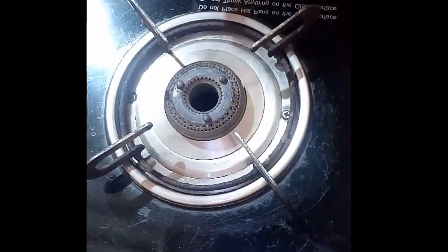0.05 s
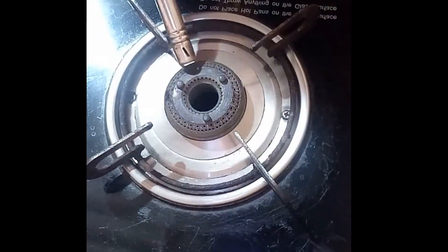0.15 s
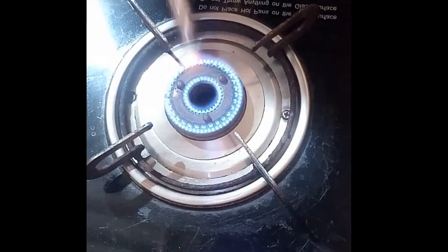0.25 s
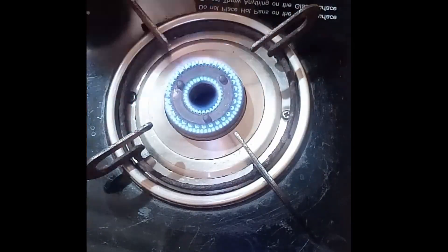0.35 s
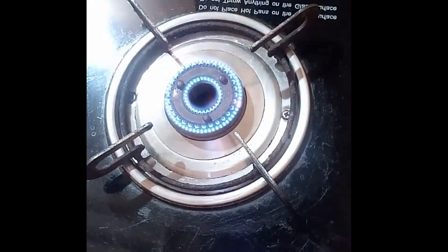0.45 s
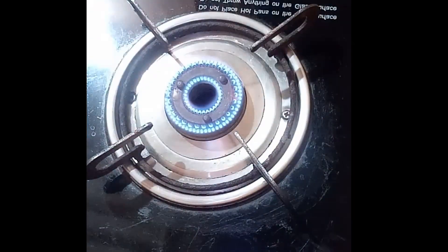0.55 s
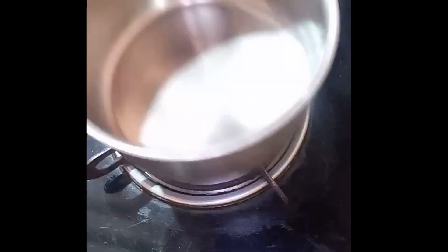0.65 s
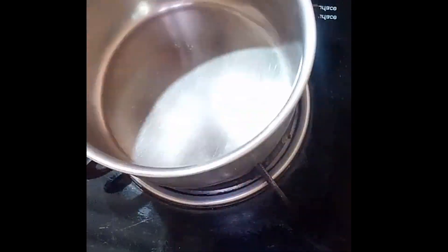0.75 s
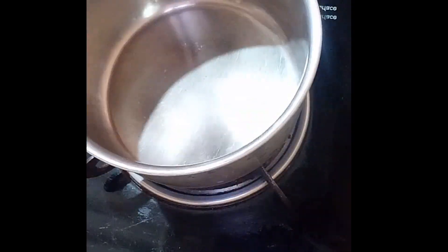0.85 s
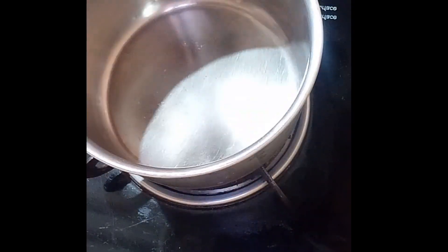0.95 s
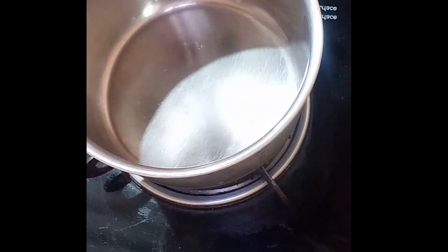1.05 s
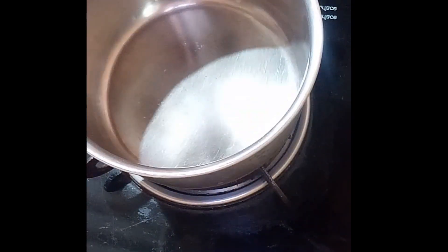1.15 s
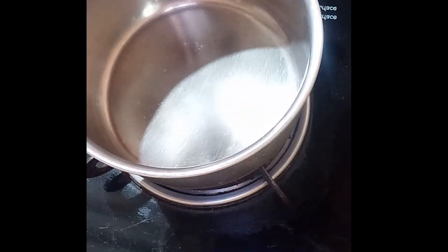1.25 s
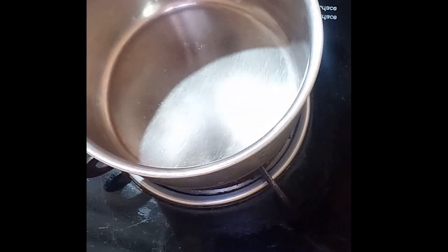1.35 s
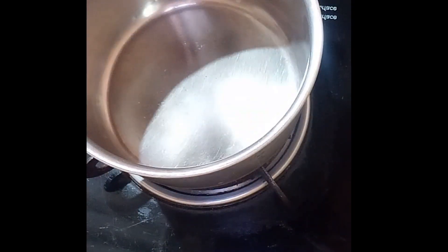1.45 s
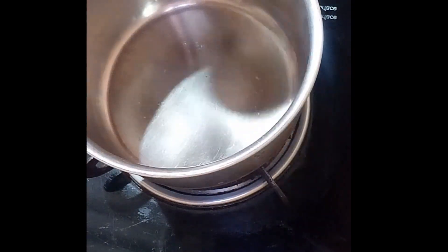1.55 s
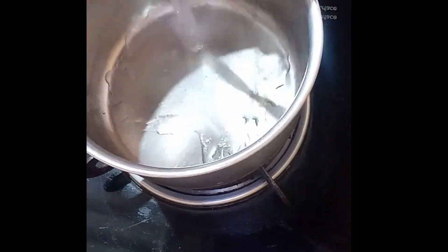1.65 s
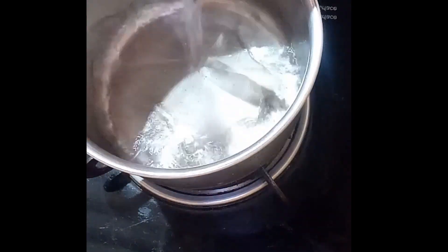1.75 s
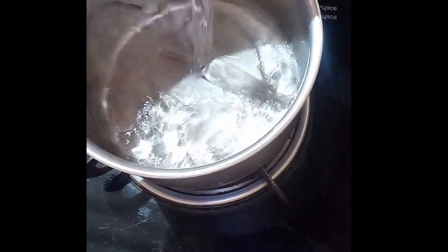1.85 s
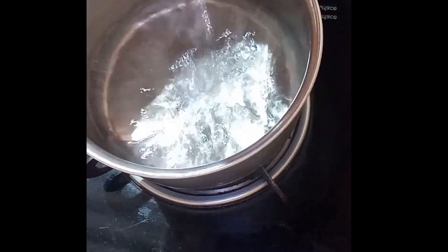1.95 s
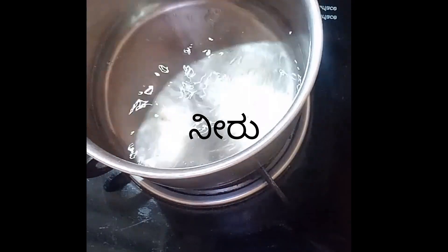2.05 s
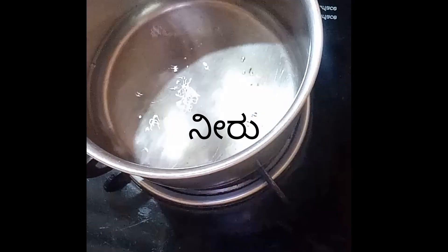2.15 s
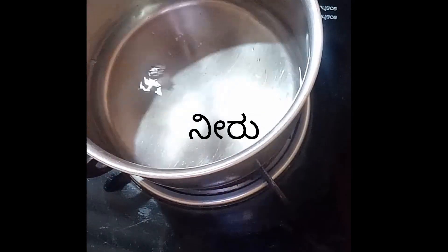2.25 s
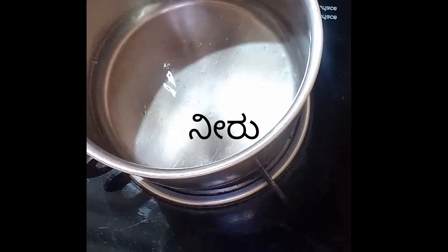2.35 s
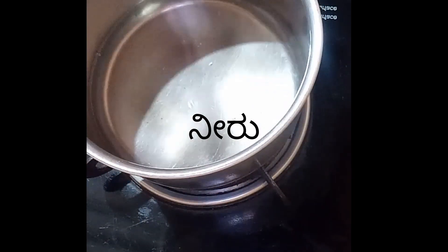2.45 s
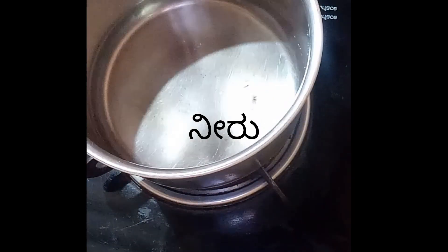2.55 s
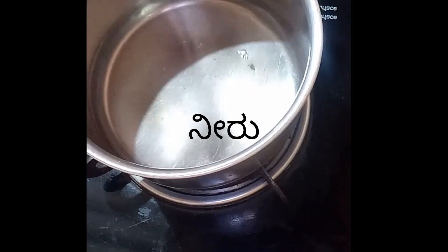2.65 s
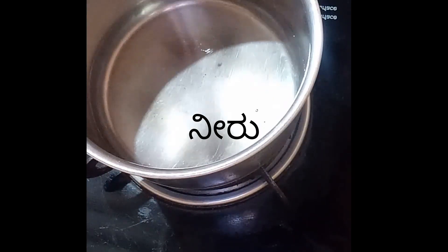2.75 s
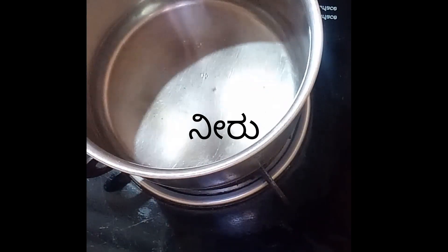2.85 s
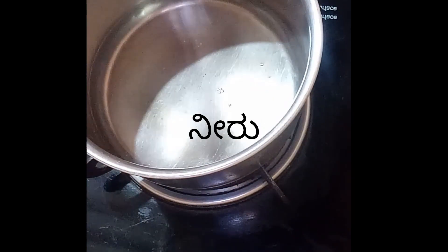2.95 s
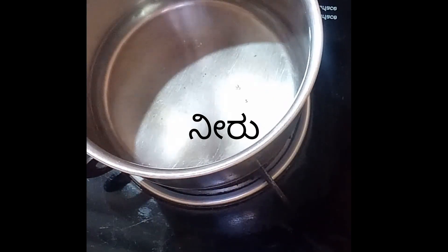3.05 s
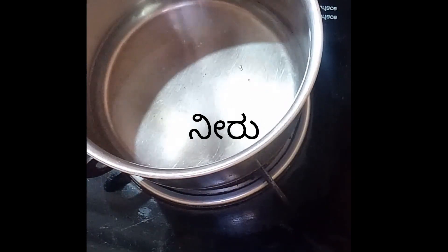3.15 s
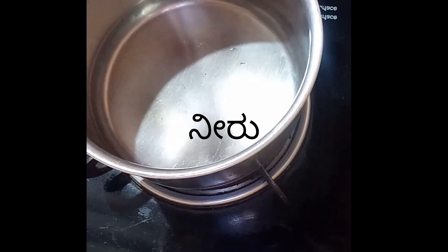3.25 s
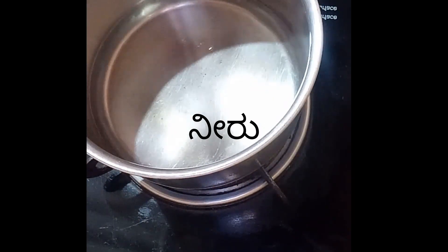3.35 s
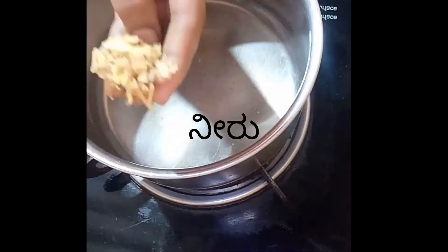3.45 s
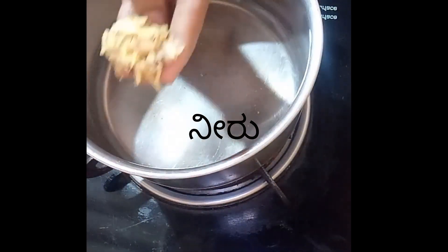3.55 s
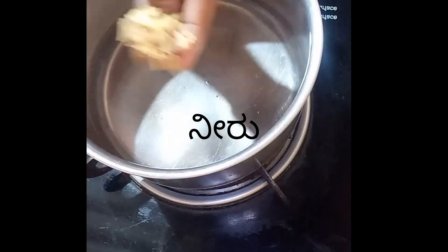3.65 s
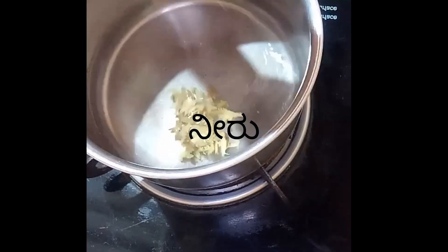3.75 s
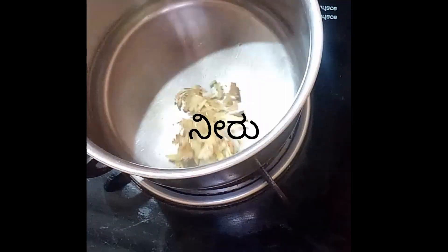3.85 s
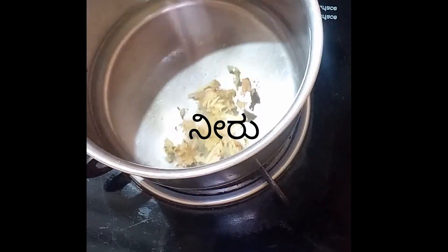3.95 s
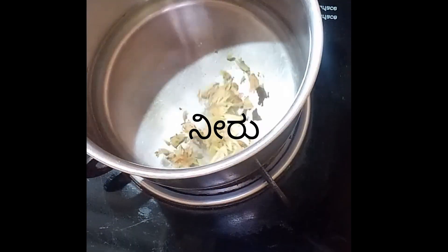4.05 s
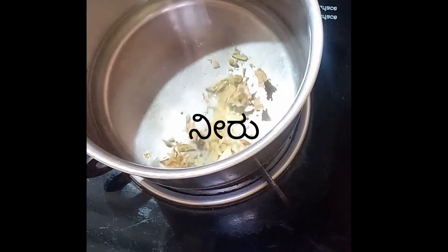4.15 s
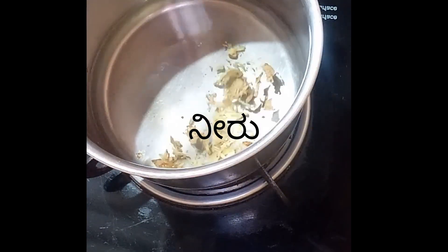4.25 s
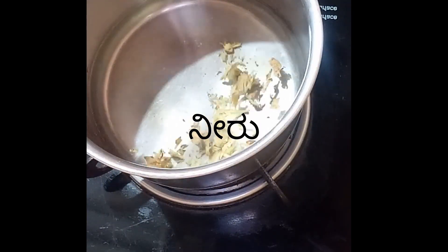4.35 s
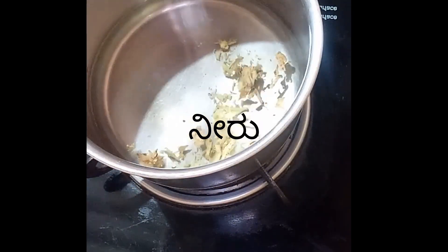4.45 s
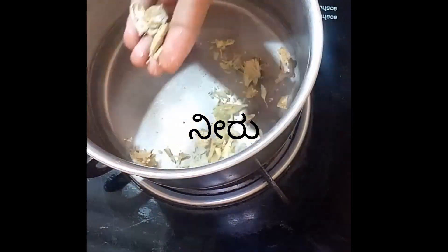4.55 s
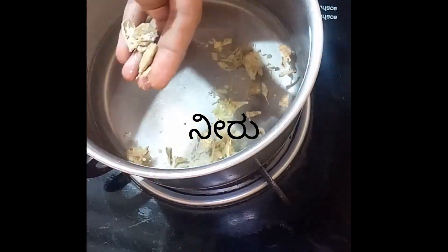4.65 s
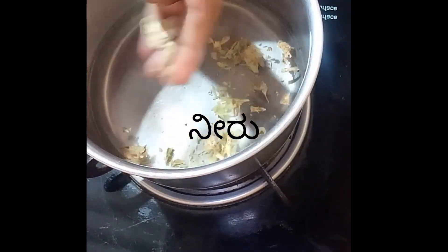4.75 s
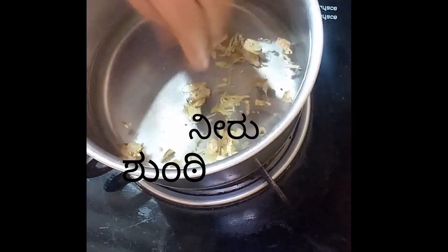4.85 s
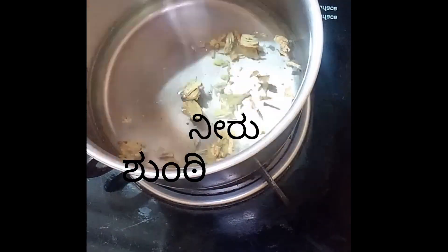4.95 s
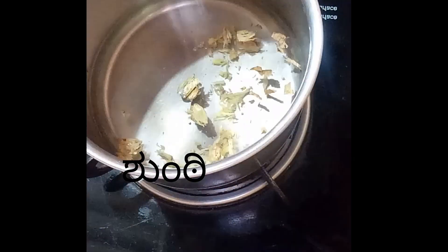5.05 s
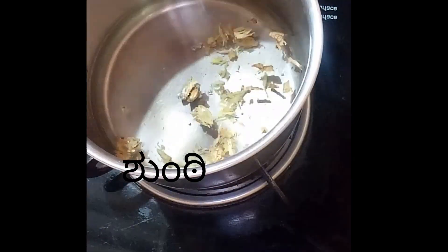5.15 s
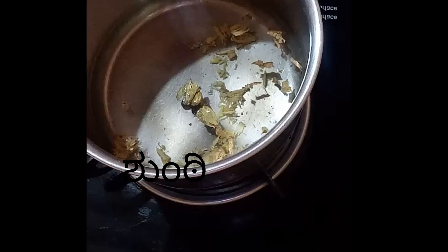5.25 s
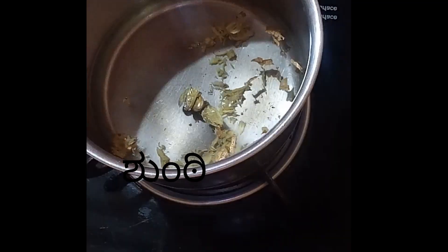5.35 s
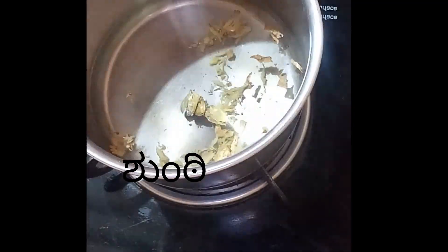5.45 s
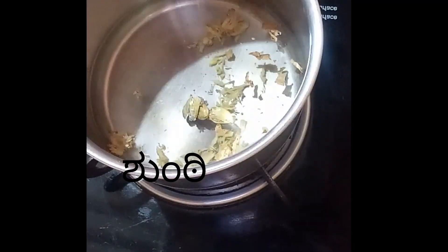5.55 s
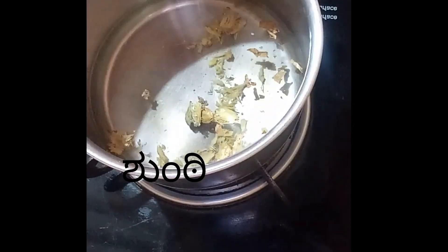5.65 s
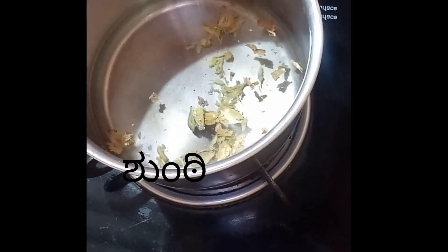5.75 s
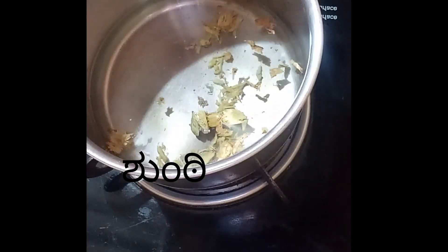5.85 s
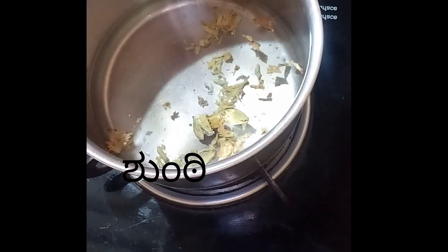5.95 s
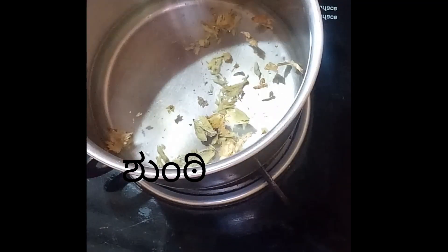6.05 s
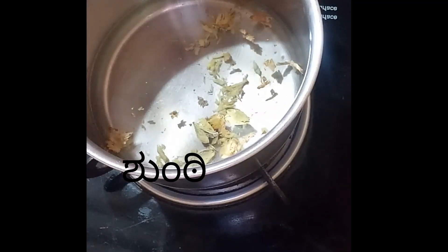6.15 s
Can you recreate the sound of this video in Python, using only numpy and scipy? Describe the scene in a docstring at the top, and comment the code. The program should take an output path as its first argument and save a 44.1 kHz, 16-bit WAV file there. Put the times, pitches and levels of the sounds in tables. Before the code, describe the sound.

Close up in a quiet kitchen, a hand fumbles with a metal gas lighter, which snaps loudly and then clicks back with a scrape. A steel pot clanks on the grate. After a pause water splashes in briefly, ending in a low thump and the hard clink of a cup. Then only faint rustles, small clinks and bangles jingling over the soft flame.

```python
"""Brief, clipped kitchen sounds close up: a piezo lighter is handled and snaps, a steel pot lands on the grate, water
splashes into it, a cup is put down, bangles jingle and dry spices rustle over the low hum of the flame.
Struck vessels are sums of decaying modes; scrapes, rustles and splashes are coloured noise bursts; clinks and bubbles
are sines blurred by narrow noise; flame and stream are long noise whose spectrum fluctuates in patches."""
import sys
import numpy as np
from scipy import signal
from scipy.fft import rfft, irfft, next_fast_len
from scipy.io import wavfile
from scipy.ndimage import uniform_filter1d

SR = 44100
rng = np.random.default_rng(int(sys.argv[2]) if len(sys.argv) > 2 else 0)


def log_audio(samples):
    """Write samples as a 16-bit WAV file to the path given in sys.argv[1]."""
    # one column per channel
    frames = np.atleast_2d(samples).T
    # limit to full scale, then quantise
    limited = np.clip(frames, -1, 1)
    pcm = np.round(limited * 32767).astype(np.int16)
    wavfile.write(sys.argv[1], SR, pcm)


N = 272820
GRAIN = 8192  # samples in one short sound before it is shaped
HZ = np.fft.rfftfreq(GRAIN, 1 / SR)
MS = 1 / 1000

# In every table of a noise colour or a set of bands or modes, level_db is relative within the table.
# colour of gritty friction: hz, level_db
GRIT = [(120, -45), (200, -6.5), (1380, -16.5), (2090, -15.5), (3890, -10), (4580, -11), (6470, -8.5),
        (15500, -16)]
# colour of spray, also the treble of rustles and jingles: hz, level_db
SPRAY = [(1180, -16), (2000, -24.5), (2330, -17), (3230, -9), (5220, 0), (6690, -1), (13400, -12),
         (14700, -2.5), (15500, -8.5)]


def amp(db):
    """Level in decibels: 20 dB is a factor of ten in amplitude."""
    return 10 ** (np.asarray(db) / 20)


def unit(x):
    """Normalisation by mean power: scaled to rms 1."""
    return x / np.sqrt(np.mean(x ** 2) + 1e-20)


def along(points, hz):
    """Spectral envelope: (hz, value) points joined by lines on a log frequency axis."""
    f, v = np.transpose(points)
    return np.interp(np.log(hz + 1), np.log(f + 1), v)


def hump(centre_hz, octaves):
    """Band of constant relative width: a Gaussian on a log frequency axis, octaves its standard deviation."""
    return np.exp(-.5 * (np.log2((HZ + 1) / centre_hz) / octaves) ** 2)


def peaks(table):
    """Resonance curves summed: each gain is halved half a width away from its centre."""
    return sum(amp(db) / (1 + (2 * (HZ - hz) / width) ** 2) for hz, width, db in table)


def puff(gain, lumpy_db=6.5):
    """Filtered noise of rms 1: random smooth bumps, lumpy_db deep, vary its spectrum each time."""
    bumps = unit(uniform_filter1d(rng.standard_normal(len(HZ)), size=40))
    noise = rfft(rng.standard_normal(GRAIN))
    return unit(irfft(gain * amp(lumpy_db * bumps) * noise))


def ring(modes, spread_db):
    """Modal synthesis: one blow starts all modes at fresh strengths, each wavering as it decays."""
    t = np.arange(GRAIN) / SR
    total = np.zeros(GRAIN)
    for hz, db, t60 in modes:
        strength_db = db + spread_db * rng.standard_normal()
        waver_db = 3.5 * unit(uniform_filter1d(rng.standard_normal(GRAIN), size=400))
        total += amp(strength_db + waver_db - 60 * t / t60) * np.sin(2 * np.pi * hz * t)
    return total


def tone(hz, blur, width_hz, glide=0):
    """Phase modelling: a sine of pitch hz * (1 + 2 * glide * t), with narrow noise around its starting pitch."""
    t = np.arange(GRAIN) / SR
    cycles = hz * t * (1 + glide * t) + rng.random()
    return np.sqrt(2) * np.sin(2 * np.pi * cycles) + blur * puff(peaks([(hz, width_hz, 0)]))


def rush(spectrum, patchy_db, tall, long):
    """Turbulent noise of rms 1: random gain patches, tall bins by long frames, vary its spectrum in time."""
    hz, _, z = signal.stft(rng.standard_normal(N), SR, nperseg=1024, noverlap=768)
    field = uniform_filter1d(rng.standard_normal(z.shape), tall, axis=0)
    field = uniform_filter1d(field, long, axis=1)
    gain = amp(along(spectrum, hz)[:, None] + patchy_db * unit(field))
    return unit(signal.istft(z * gain, nperseg=1024, noverlap=768)[1][:N])


def add(track, sound, s, db, length, rise=0.0052, t60=0.24, fade=0.002):
    """Envelope and superposition: linear rise, exponential decay, fade centred on length; times in seconds."""
    t = np.arange(len(sound)) / SR
    attack = np.clip(t / rise, 0, 1)
    release = np.clip((length + fade / 2 - t) / fade, 0, 1)
    shape = attack * amp(db - 60 * t / t60) * release
    track[round(s * SR):][:len(t)] += sound * shape


def jingle(track, bands, s, db, length, tilt_db):
    """Inharmonic partials of touched thin metal: steady sines, narrow noise around them, a breath of treble."""
    t = np.arange(GRAIN) / SR
    hz, _, band_db = np.transpose(bands)[:, :, None]
    # tilt_db per octave about 9 kHz; each touch differs a little from the next
    partial_db = band_db + tilt_db * np.log2(hz / 9000) + 1.5 * rng.standard_normal(hz.shape)
    partials = amp(partial_db) * np.sin(2 * np.pi * (hz * t + rng.random(hz.shape)))
    tilt = amp(tilt_db) ** np.log2(HZ / 9000 + 0.095)  # the offset keeps 0 Hz finite
    blur = puff(peaks(bands) * tilt, lumpy_db=1.5)
    breath = puff(amp(along(SPRAY, HZ)) * hump(12000, octaves=4.5), lumpy_db=5.0)
    sound = unit(partials.sum(0)) + amp(2.0) * blur + amp(-4) * breath
    add(track, sound, s, db - 4.5, length * MS, rise=0.12 * length * MS, t60=0.77, fade=0.006)


def flame():
    """Combustion noise: a fluttering low rumble and a flickering hiss, each with its own slow level."""
    # burner level over time: time_s, rumble_db, hiss_db
    burner = [(0, -56.5, -58), (1.102, -62.5, -63.5), (2.301, -57.5, -60.5), (3.6, -60.5, -62.5),
              (3.78, -66.5, -63), (4.1, -63, -62), (6.19, -60.5, -61.5)]
    # colour of the rumble: hz, level_db
    rumble_colour = [(12, -50.5), (20, -21), (43, -17), (70, -1.5), (141, -2), (269, -16), (325, -31.5),
                     (500, -30.5), (650, -57), (1100, -120)]
    # colour of the hiss: hz, level_db
    hiss_colour = [(300, -13), (500, -6.5), (900, -7.5), (1400, -10), (3000, -13), (5000, -11),
                   (6400, -9.5), (7300, -19.5), (10800, -16.5), (12900, -17.5), (14000, -16.5), (15200, -4)]
    s, rumble_db, hiss_db = np.transpose(burner)
    now = np.arange(N) / SR
    rumble = amp(np.interp(now, s, rumble_db)) * rush(rumble_colour, patchy_db=4.5, tall=4, long=5)
    hiss = amp(np.interp(now, s, hiss_db)) * rush(hiss_colour, patchy_db=3.0, tall=120, long=4)
    return rumble + hiss


def rustles(track):
    """Friction noise of fingers and dry spices: puffs of treble with a bright patch that strays slightly."""
    # dry rustles: start_s, level_db, length_ms
    touches = [(0.018, -56.5, 19), (0.134, -52.5, 10.3), (0.258, -44, 17), (0.54, -52.5, 42),
               (0.564, -51, 25), (0.838, -56, 29), (1.441, -50.5, 37), (2.502, -62.5, 15), (2.664, -58, 17),
               (2.77, -58, 30), (3.082, -51.5, 44), (3.715, -57, 29), (3.921, -49, 6), (3.942, -59, 27),
               (3.958, -48, 28), (3.988, -58.5, 34), (4.045, -57, 15), (4.175, -58.5, 20),
               (4.536, -59.5, 12), (4.783, -54.5, 42), (4.901, -65, 27), (5.085, -61.5, 29),
               (5.429, -60, 39), (5.799, -59.5, 61), (5.883, -57, 27), (6.076, -60, 25), (6.131, -64.5, 11)]
    for s, db, length in touches:
        bright_hz = 6230 * 2 ** (0.021 * rng.standard_normal())
        patch = puff(hump(bright_hz, octaves=0.14))
        treble = amp(2.0) * puff(amp(along(SPRAY, HZ)))
        add(track, patch + treble, s, db, length * MS, rise=0.28 * length * MS, t60=0.19, fade=.5 * length * MS)


def knocks(track):
    """Damped impact of hands and vessels: a body tone, a broad thud between it and 700 Hz, and a little grit."""
    # knocks, dull to bright, with a faint rustle and a crunch:
    # start_s, level_db, body_hz, body_tone_db, length_ms
    blows = [(0.096, -34.5, 2400, -9, 3.2), (.129, -31.5, 1220, -5.5, 7.1), (0.138, -45.5, 1400, -15, 32),
             (0.155, -38, 803, -15, 20), (.178, -46.5, 1020, -18, 33), (0.197, -30.5, 850, -8, 7.6),
             (.2, -35, 720, -14, 18.3), (0.258, -36.5, 913, -12, 16), (0.281, -45.5, 1205, -6.5, 22),
             (0.361, -72.5, 4630, 9, 21.6), (0.543, -48, 755, -1, 39), (0.575, -34, 550, 3.5, 16.3),
             (.765, -36.5, 264, -15, 54), (0.788, -34.5, 623, 3, 14), (0.867, -52.5, 900, -15, 31),
             (0.921, -39, 245, -3, 30), (0.945, -54, 482, -10.5, 25), (1.498, -70.5, 237, 16.5, 27),
             (1.665, -39.5, 239, 1.5, 30.6), (2.04, -33, 490, -6, 23), (2.116, -52, 673, -2, 32),
             (2.149, -49, 224, -0.5, 20), (2.249, -58.5, 1497, -11, 60), (2.335, -55, 544, -4.5, 32),
             (2.658, -68, 224, 16.5, 23), (3.002, -64, 801, 6, 22), (3.09, -60, 1380, -1.5, 30),
             (3.22, -61, 1130, -10.5, 74), (3.41, -61.5, 868, -6, 21), (3.921, -60.5, 1196, 2, 7.8),
             (4.776, -49.5, 222, 6.5, 43), (4.782, -50, 3520, -14, 77), (5.397, -52, 1280, -3, 26.5),
             (5.43, -60.5, 1460, -1, 17)]
    for s, db, hz, tone_db, length in blows:
        body = amp(tone_db) * tone(hz, blur=hz / 1500, width_hz=0.25 * hz)
        thud_band = hump(np.sqrt(700 * hz), octaves=1.0) * (HZ > 150)
        thud = amp(-3) * puff(thud_band, lumpy_db=3.2)
        grit = amp(-17) * puff(amp(along(GRIT, HZ)) * hump(3000, octaves=1.0), lumpy_db=2.0)
        add(track, body + thud + grit, s, db, length * MS, rise=0.12 * length * MS, t60=0.37, fade=0.013)


def trigger(track):
    """Friction-excited resonance: the lighter's trigger slides and sings in fixed bands."""
    # slides: start_s, level_db (before the jingle's trim), length_ms, brightness_db_per_octave
    slides = [(.151, -38.5, 22.4, 0), (.177, -55, 18, 0)]
    # resonances of the trigger: centre_hz, width_hz, level_db
    bands = [(2730, 210, -16), (5150, 240, -18), (6590, 80, 1.5), (7950, 87, -16), (10000, 88, -10),
             (10830, 110, -7.5)]
    for row in slides:
        jingle(track, bands, *row)


def lighter(track):
    """Impact and stick-slip: the hammer cracks and rings the barrel; sliding steel sings in narrow bands."""
    # hammer blows: start_s, level_db, barrel_ring_db, length_s
    snaps = [(0.2426, -10.5, -14, .014), (0.4197, -23.5, 1, 0.013)]
    # colour of the crack: hz, level_db
    crack_colour = [(120, -43.5), (200, -13), (890, -8), (1540, -11), (4100, -10.5), (4580, -10.5),
                    (6600, -4.5), (8200, -12.5), (11400, -21), (15500, -8.5)]
    # modes of the barrel: pitch_hz, level_db, t60_s (the envelope of the snap adds its own decay)
    barrel = [(2710, -2, 0.029), (3376, -1.5, 0.091), (5150, 2.5, 0.034), (6400, -5, 0.13),
              (7450, -0.5, 0.06), (9900, -7.5, 0.074), (10770, -8, .06), (14600, -3, 0.043),
              (14730, 0.5, 0.036)]
    # steel sliding on steel: start_s, level_db, length_s, t60_s
    scrapes = [(0.432, -40, 0.014, 0.34), (0.4395, -32.5, 0.024, 0.51), (0.46, -33, 0.027, 0.13),
               (0.484, -55, 0.019, .2)]
    # bands of the scrape: centre_hz, width_hz, level_db
    squeal_bands = [(3840, 130, 3), (6600, 140, 3.5), (7750, 190, -1.5), (10260, 82, -2), (14700, 250, -6),
                    (15230, 110, -7.5)]
    for s, db, ring_db, length in snaps:
        crack = puff(amp(along(crack_colour, HZ)), lumpy_db=6.0)
        sound = crack + amp(ring_db) * ring(barrel, spread_db=0.5)
        add(track, sound, s, db, length, rise=0.002, t60=0.073, fade=0.0033)
    rasp_per_s, rasp_db = 260, 2.2  # roughly how often the sliding steel catches, and how deep
    for s, db, length, t60 in scrapes:
        catch_noise = uniform_filter1d(rng.standard_normal(GRAIN), round(SR / rasp_per_s / 2))
        catches = amp(rasp_db * unit(catch_noise))
        squeal = puff(peaks(squeal_bands), lumpy_db=3.0)
        grit = amp(-1.0) * puff(amp(along(GRIT, HZ)) * hump(7000, octaves=5.3), lumpy_db=0.0)
        add(track, (squeal + grit) * unit(catches), s, db, length, rise=0.0036, t60=t60, fade=0.0022)


def thumps(track):
    """Low resonance of a panel: the counter answers a bump with a low decaying note, faded out at 40 ms."""
    # bumps on the counter: start_s, level_db, pitch_hz, t60_s
    bumps = [(0.254, -31, 90.5, 0.12), (2.0347, -10, 146.7, 0.11), (2.043, -5.5, 237, 0.04),
             (2.365, -32.5, 227.5, 0.12), (4.289, -44, 267.4, 0.098)]
    t = np.arange(4000) / SR
    for s, db, hz, t60 in bumps:
        add(track, np.sin(2 * np.pi * hz * t), s, db, .04, rise=0.0074, t60=t60, fade=0.009)


def grate(track):
    """Modal ringing of bars: the brushed grate sounds its modes, with a wash of unresolved ones."""
    # modes of the grate: pitch_hz, level_db, t60_s (the envelope adds its own decay)
    modes = [(776, 0.5, 0.68), (1150, -1.5, 0.91), (1450, 3, 0.27), (1703, -6.5, .4), (1982, -6.5, 0.34),
             (2590, -9, 0.34), (3140, -7, 0.28), (3200, -10.5, 0.24)]
    # the brush: start_s, level_db, length_s
    brush = (0.572, -48.5, 0.11)
    wash = 0.15 * puff(hump(1200, octaves=0.96), lumpy_db=3.5)
    add(track, ring(modes, spread_db=2.5) + wash, *brush, rise=0.02, t60=1.4, fade=0.14)


def clinks(track):
    """Single-mode resonance: short clinks of steel as wavering tones, a sine blurred by narrow noise."""
    # short clinks, some clear and some faint: start_s, pitch_hz, level_db, length_ms
    touches = [(0.573, 2440, -38, 11.7), (.765, 2970, -48, 22), (.765, 3800, -51, 25),
               (0.787, 5500, -46.5, 11), (.925, 1780, -59, 30), (0.923, 3000, -54.5, 20),
               (2.425, 3305, -68.5, 39), (3.472, 4740, -68, 33), (4.78, 1570, -54, 33),
               (4.786, 719, -54.5, 59), (4.81, 3200, -62, 30), (4.852, 3540, -67, 24),
               (4.852, 892, -66.5, 24), (5.14, 1305, -55.5, 19.6), (5.397, 2477, -65, 28)]
    for s, hz, db, length in touches:
        add(track, tone(hz, blur=0.77, width_hz=150), s, db, length * MS, rise=0.00384, fade=0.02)


def pot(track):
    """Modal response of a steel shell to impact: a short clank, ringing modes and a wash of unresolved ones."""
    # the pot lands and settles: start_s, level_db (each layer is offset from it), ring_s
    landings = [(0.7197, -20.5, .034), (0.763, -46, 0.017)]
    # modes of the pot: pitch_hz, level_db, t60_s (the envelope adds its own decay)
    modes = [(488.5, -13, 0.044), (600, -12, 0.096), (826, 0.5, 0.0207), (2150, -1, 0.21),
             (2456, -22, 0.34), (2520, -14.5, 0.29), (2888, -10.5, 0.23), (2924, -19, .25),
             (3190, -13.5, 0.24), (3590, -10, 0.31), (3950, -14, 0.19), (4860, -16, 0.25),
             (5350, -12.5, 0.1), (5950, -13.5, 0.085), (6400, -14, 0.17)]
    # colour of the clank: hz, level_db
    clank_colour = [(150, -33.5), (450, 10), (1620, -9.5), (2090, -15), (5390, -9.5), (11600, -14),
                    (12700, -29), (14700, -6.5), (15500, -26)]
    for s, db, length in landings:
        clank = puff(amp(along(clank_colour, HZ)), lumpy_db=4.5)
        wash = puff(hump(3000, octaves=0.82), lumpy_db=4.5)
        add(track, clank, s, db + 4.5, .007, rise=0.0035, t60=0.031)
        add(track, ring(modes, spread_db=1.2), s, db + 0.44, length, rise=.004, t60=3.7, fade=0.018)
        add(track, wash, s, db - 9.0, length + 0.01004, t60=0.19, fade=0.016)


def bangles(track):
    """Inharmonic resonance of thin hoops: bangles touch and sound the same bands at varying brightness."""
    # touches: start_s, level_db (before the jingle's trim), length_ms, brightness_db_per_octave
    touches = [(0.783, -56.5, 45, 8), (2.708, -53, 33, 2), (2.737, -52.5, 27, 12), (2.812, -56.5, 35, 10),
               (2.828, -45.5, 8, 3.5), (3.018, -60, 14.5, -9), (5.52, -45, 24.6, 2), (5.54, -38, 4, 6),
               (5.548, -51.5, 6.2, -1), (5.558, -39, 8.8, 3)]
    # resonances of the bangles: centre_hz, width_hz, level_db
    bands = [(4990, 21, -4.5), (6750, 250, -0.5), (9400, 81, -12), (9800, 79, -7.5), (10970, 120, -12.5),
             (13000, 170, -7), (14700, 80, -8), (14700, 180, -9.5)]
    for row in touches:
        jingle(track, bands, *row)


def water(track):
    """Turbulence and resonance: spray above, slosh below, a rising air note, ringing bubbles, bright splashes."""
    # the stream over time: time_s, spray_db, slosh_db (the slosh noise lies 1.5 dB below)
    stream = [(1.619, -73, -71), (1.624, -28, -39.5), (1.631, -29, -36.5), (1.638, -54, -49),
              (1.644, -39, -51), (1.648, -28.5, -41.5), (1.668, -32.5, -41), (1.686, -41.5, -60),
              (1.707, -41, -64), (1.712, -53, -49.5), (1.729, -56, -53.5), (1.736, -68, -67),
              (1.75, -57, -58), (1.768, -48.5, -57.5), (1.804, -52.5, -58), (1.805, -44.5, -53),
              (1.832, -47.5, -50), (1.842, -60, -55.5), (1.874, -48.5, -54), (1.901, -52.5, -51.5),
              (1.908, -41.5, -43.5), (1.95, -45.5, -49), (1.979, -40, -41), (2.011, -44.5, -43.5),
              (2.031, -64, -56.5), (2.041, -59, -56)]
    # colour of the slosh: hz, level_db
    slosh_colour = [(180, -40), (300, -23.5), (770, -2), (978, -16.5), (1540, -7), (1680, -8),
                    (2650, -10.5), (4000, -11), (5200, -47), (8800, -120)]
    # single bubbles in the pot: start_s, starting_pitch_hz, level_db, life_ms
    bubbles = [(1.665, 2270, -50, 43), (1.735, 630, -48, 13), (1.752, 1550, -58, 25),
               (1.945, 2310, -43, 17), (1.96, 1500, -45, 22), (2.583, 1630, -69.5, 41),
               (2.651, 1642, -66, 33), (3.25, 760, -61.5, 35), (3.36, 2310, -69, 30), (3.36, 1750, -70, 21),
               (3.41, 1500, -69.5, 21), (5.96, 1353, -67, 47)]
    # bright splashes in the stream: start_s, level_db, length_ms, centre_hz
    splashes = [(1.69, -39.5, 16.5, 5840), (1.715, -44, 17.6, 9700), (1.76, -44, 26, 7060),
                (1.804, -41.5, 17, 7000), (1.925, -41, 16, 6600), (2.01, -43.5, 19, 6770)]
    s, spray_db, slosh_db = np.transpose(stream)
    now = np.arange(N) / SR
    spray = amp(np.interp(now, s, spray_db, left=-120, right=-120))
    slosh = amp(np.interp(now, s, slosh_db, left=-120, right=-120))

    # air under the stream sings higher as the pot fills: 1200 Hz per second for a third of a second
    air_hz = 453 + 1200 * np.clip(now - s[0], 0, 1 / 3)
    air_width_hz, air_db = 60, -5  # level over the slosh envelope
    flutter = unit(uniform_filter1d(rng.standard_normal(N), round(SR / air_width_hz)))
    air = amp(air_db) * flutter * np.sin(2 * np.pi * np.cumsum(air_hz) / SR)

    for at, hz, db, life in bubbles:
        bubble = tone(hz, blur=0.84, width_hz=160, glide=0.34)
        add(track, bubble, at, db, life * MS, rise=0.0063, fade=0.014)
    for at, db, length, hz in splashes:
        add(track, puff(hump(hz, octaves=0.13)), at, db, length * MS, rise=.003, fade=.006)
    track[:N] += spray * rush(SPRAY, patchy_db=3.5, tall=20, long=2)
    track[:N] += slosh * (amp(-1.5) * rush(slosh_colour, patchy_db=4, tall=5, long=3) + air)


def cup(track):
    """Damped modes and beating: the cup lands, rocks once and is stilled by the hand; close mode pairs beat."""
    # landing and rock: start_s, level_db (the wash lies 13.5 dB below), ring_s before the hand stills it
    landings = [(2.2054, -15, .012), (2.2169, -20, 0.018)]
    # modes of the cup: pitch_hz, level_db, t60_s (the envelope adds its own decay)
    modes = [(793.5, -2.5, 0.15), (880, -5.5, 0.2), (977, -11.5, 0.11), (1440, -16, 0.26),
             (2410, -9.5, 0.13), (4970, -16, 0.15), (4670, -4, 0.42), (4758, -0.5, 0.17),
             (7780, -14.5, 0.086), (9200, -23.5, 0.069), (12700, -23, 0.056)]
    for s, db, length in landings:
        wash = puff(hump(1300, octaves=1.6), lumpy_db=3)
        add(track, ring(modes, spread_db=1.2), s, db, length, rise=0.0019, t60=0.4, fade=0.027)
        add(track, wash, s, db - 13.5, length + 0.015, rise=0.0028, t60=0.056, fade=0.027)


def tin(track):
    """Resonance of thin sheet metal: a touched spice tin sounds in fixed bands."""
    # touches: start_s, level_db (before the jingle's trim), length_ms, brightness_db_per_octave
    touches = [(5.136, -60, 22, -2), (5.399, -57.5, 24, -5), (5.419, -46.5, 23.7, 4.5)]
    # resonances of the tin: centre_hz, width_hz, level_db
    bands = [(2510, 83, -6.5), (6100, 71, -3.5), (6570, 114, 1.5), (7380, 60, -3), (9300, 25, -8.5),
             (10380, 67, -5.5), (13640, 60, -10.5), (14700, 90, -4)]
    for row in touches:
        jingle(track, bands, *row)


def scene():
    """Superposition: all sources add on one track."""
    track = np.zeros(N + SR)
    for source in (rustles, knocks, trigger, lighter, thumps, grate, clinks, pot, bangles, water, cup, tin):
        source(track)
    return (track[:N] + flame())[None]


def record(dry):
    """Linear filtering: the microphone's response falls away at both ends, with nothing from 16.8 kHz up."""
    # response of the microphone: hz, gain_db
    response = [(30, -4), (80, -1), (12000, 0.5), (15000, 1.5), (15600, 3), (15780, -14.5), (16500, -20.5),
                (16800, -39.5)]
    m = next_fast_len(N + 8192)
    hz = np.fft.rfftfreq(m, 1 / SR)
    gain = amp(along(response, hz)) * (hz < 16800)
    return irfft(rfft(dry, m) * gain, m)[..., :N]


dry = scene()
out = record(dry)
log_audio(out)
```